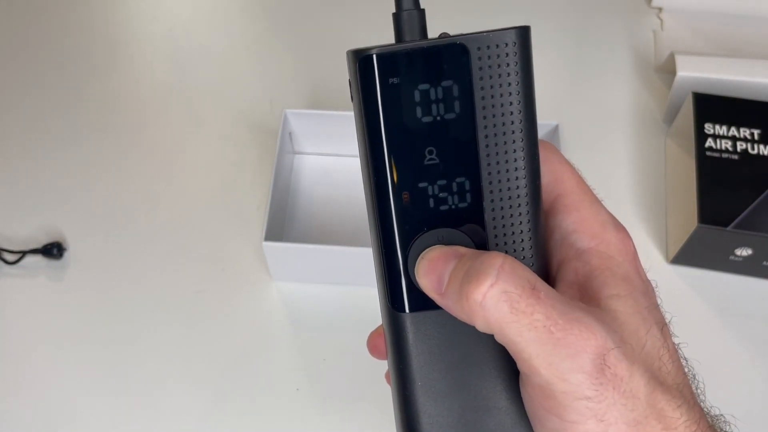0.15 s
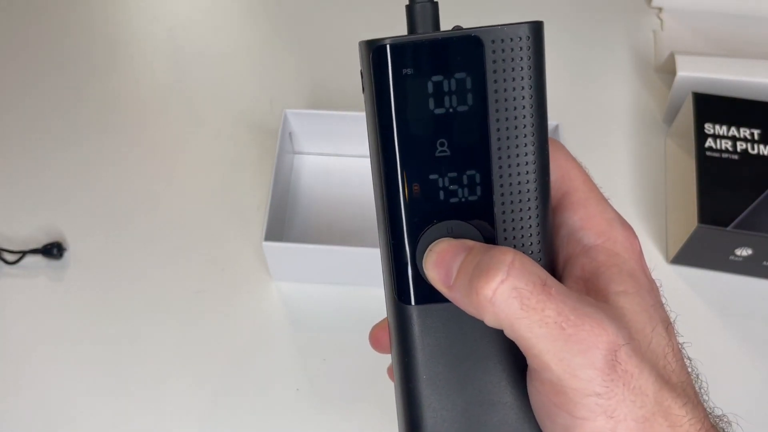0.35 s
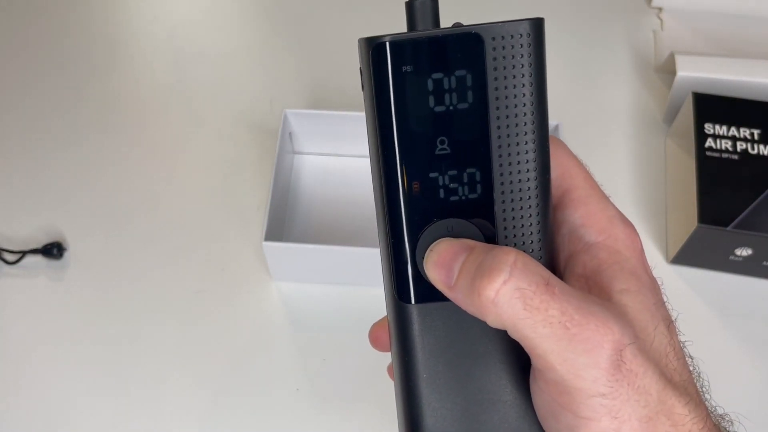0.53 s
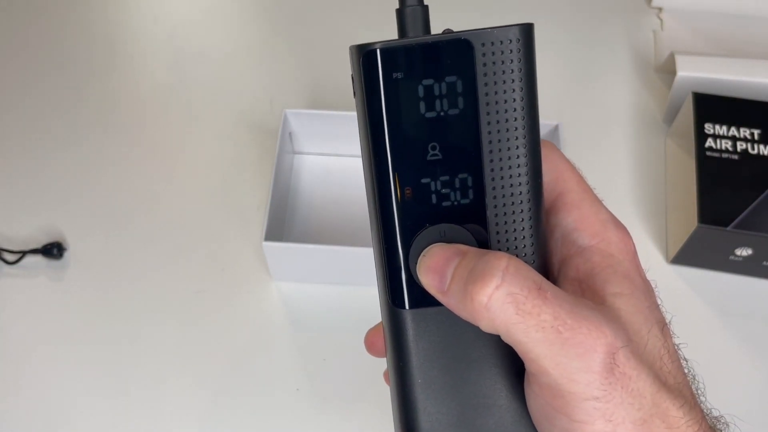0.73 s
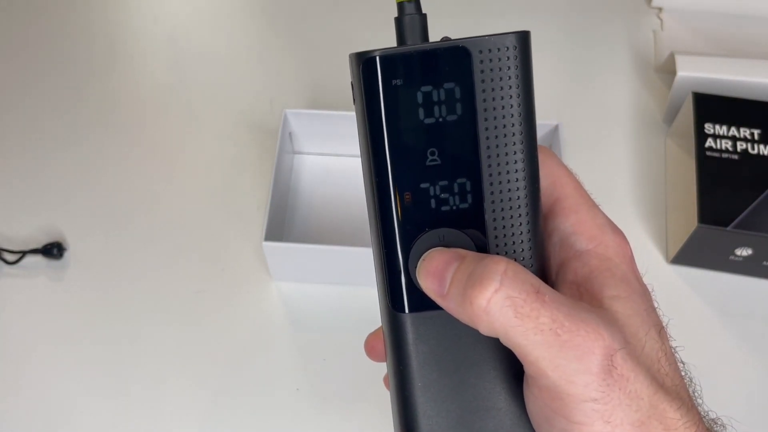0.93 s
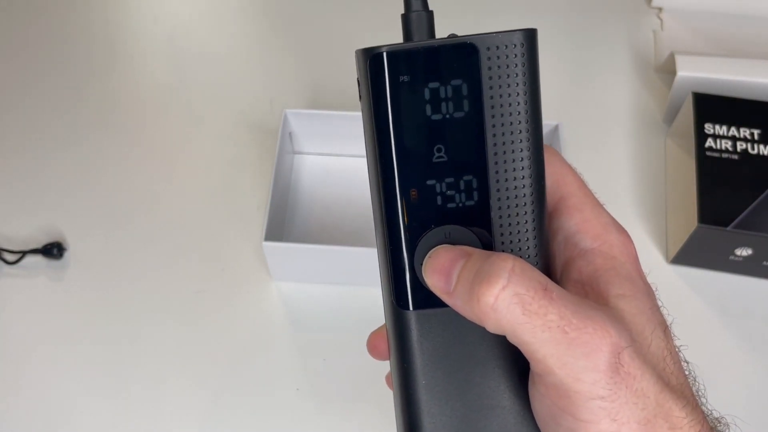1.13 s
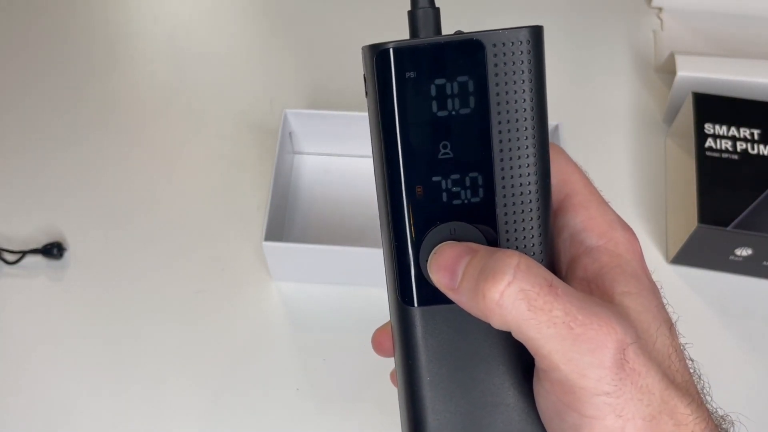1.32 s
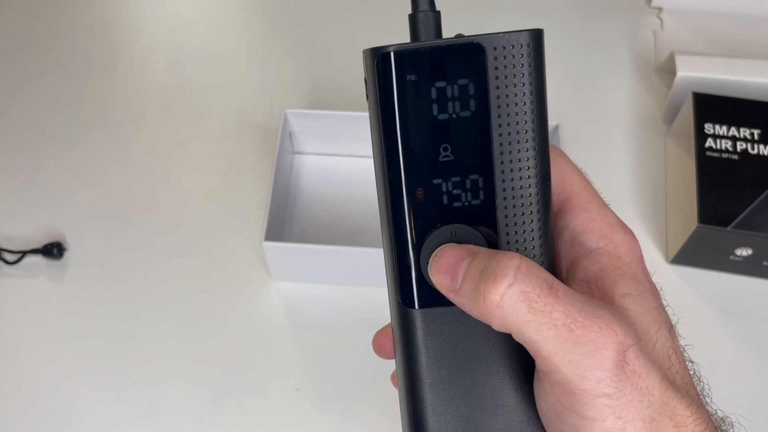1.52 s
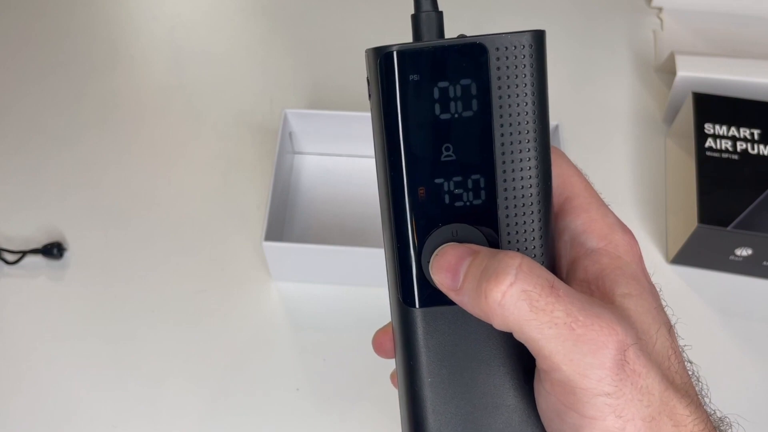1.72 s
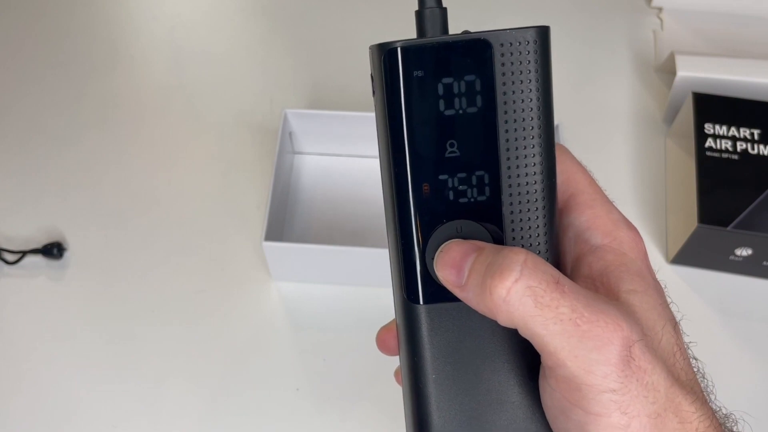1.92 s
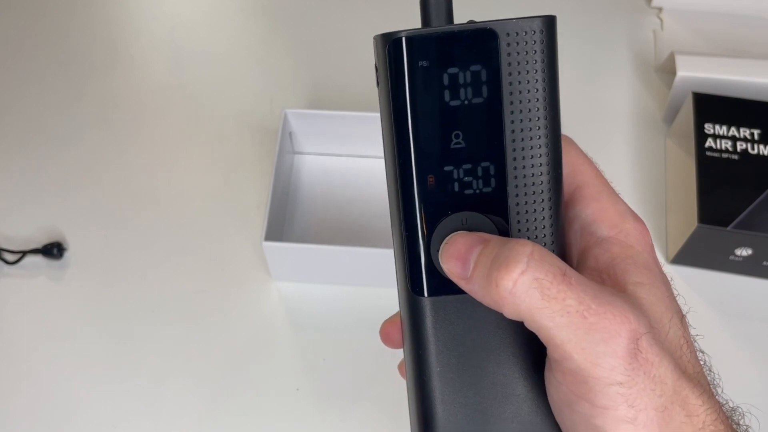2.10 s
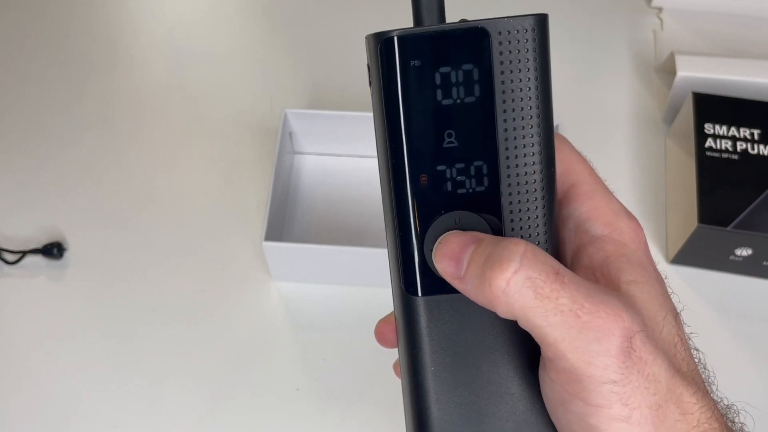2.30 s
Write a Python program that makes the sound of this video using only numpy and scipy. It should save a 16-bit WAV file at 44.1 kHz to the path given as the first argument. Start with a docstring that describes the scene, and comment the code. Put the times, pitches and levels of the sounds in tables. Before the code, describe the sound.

A small electric air pump is switched on close by in a quiet room. Soft room air and low hum until 0.32 s, then a faint button click and a hard jolt around 0.35 s. The motor climbs in pitch until about 0.5 s, then holds a dense, bright buzz of about fifty knocks per second, with plastic rattle, gear whine and airy spits, slightly softer after 1 s, still running at 2.3 s.

```python
"""A hand-held electric tire pump, switched on close by in a quiet room with a low hum, heard in stereo. A small
motor drives a one-cylinder piston pump through an 11 : 50 gear. Valve knocks are ringing contacts, outlet puffs
are sums of crank orders, valve spits are treble noise: all repeat once per crank turn. Tooth contacts and loose
rattle are coloured by the plastic shell; sines make the motor and gear whine. Before the pump starts only room
air, hum and the button clicks are heard; the room sinks as the pump comes in."""
import sys
import numpy as np
from scipy import signal
from scipy.fft import rfft, irfft, next_fast_len
from scipy.io import wavfile
from scipy.ndimage import uniform_filter1d

SR = 44100
rng = np.random.default_rng(int(sys.argv[2]) if len(sys.argv) > 2 else 0)


def inscribe(sig):
    """Save sig as 16-bit PCM at rate SR to the path in sys.argv[1].

    A 1-D sig is mono; a 2-D sig holds one channel per row.
    Samples are clipped to [-1, 1] before scaling.
    """
    pcm = np.round(np.clip(np.atleast_2d(sig).T, -1, 1) * 32767)
    wavfile.write(sys.argv[1], SR, pcm.astype(np.int16))


N = 103635

# room air before the start: f/Hz, relative density level/dB per Hz
ROOM_AIR = [(15, -33), (25, -10), (59, -5), (125, -2.5), (167, -13.5), (224, -11), (515, -20.5),
            (6370, -58.5), (9020, -67.5), (15000, -63)]
# low hum lines before the start: f/Hz, level/dB
ROOM_HUM = [(59.2, -55), (118.4, -56), (177.6, -70), (215.3, -61), (269.2, -65), (349.9, -68)]
# thumb on the button, first jolt of the drive: t/s, peak level/dB, f/Hz, t60/s of each of two rings
BUTTON_CLICKS = [(.321, -37.5, 890, 0.0051), (0.321, -45, 1900, 0.0038), (.3215, -56, 2900, .003),
                 (0.341, -34, 2970, 0.0045), (0.347, -16, 2880, 0.0062), (0.3653, -7.5, 1500, 0.013)]
# crank speed: t/s, speed/turns per s
CRANK_SPEED = [(0.345, 36.0), (0.37, 38.7), (0.4, 41.86), (0.44, 47.05), (0.48, 48.68), (0.53, 50.03),
               (0.65, 50.06), (0.9, 50.28), (1.2, 50.45), (1.6, 50.59), (2.0, 50.74), (2.35, 50.79)]
# gain of the running pump: t/s, level/dB
PUMP_LEVEL = [(.35, -21), (.37, -16.5), (.43, -17.5), (.5, -20), (.75, -19), (.84, -20), (.91, -19),
              (.96, -22), (1.2, -22.5), (1.6, -22.5), (2.0, -23), (2.35, -23)]
# load on the gear around a crank turn: position/share of turn, level/dB
GEAR_LOAD = [(0, 1), (.14, -4.5), (.38, 0), (.56, -1), (.66, -1), (.8, 3), (.92, -2)]
# what the plastic shell radiates: f/Hz, relative density level/dB per Hz
SHELL_BODY = [(400, -28), (550, -24), (800, -14), (1100, -16.5), (1500, -14.5), (2000, -8), (2300, -9),
              (2750, -3), (3100, -5.5), (3500, -17), (4000, -10.5), (4500, -18), (4900, -22), (5300, -14),
              (5700, -11.5), (6100, -26), (6350, -9.5), (6600, -29.5), (7000, -19)]
# treble end of the same shell curve: f/Hz, relative density level/dB per Hz
SHELL_TREBLE = [(7600, -24), (8500, -24), (9500, -23), (11000, -25), (13000, -26), (14500, -25),
                (15000, -29), (15700, -30)]
# knocks in each turn: position/share of turn, relative level/dB, f/Hz, t60/s of each of two rings, spread/dB
VALVE_KNOCKS = [(0.92, -14, 1095, 0.0085, 5.5), (.78, -4, 2200, 0.019, 1), (0.1059, -7, 2600, 0.031, 3),
                (.76, -9.5, 1310, 0.0071, 0), (0.61, -12.5, 6000, 0.0074, 1.5)]
# motor and gear tones: multiple of motor speed, relative level/dB, depth of swing with the crank/0-1
WHINE_TONES = [(3, -27.5, 0), (11, -14.5, 0.1), (12, -5.5, 0.28), (13, -32.5, .4), (20, -23.5, 0.2)]
# air pulse at the open outlet: crank order, relative level/dB at 1.3 s, change/dB per s
PUFF_ORDERS = [(2, -8, 0), (3, 0, 0), (4, 0, -1), (5, -4, 0), (6, -1, 0), (7, -3, -7), (8, -9, -3),
               (9, -7, 0), (10, -13, -6), (11, -9, -2), (12, -3, -1), (13, -5, -1), (14, -5, 0),
               (15, -5, 0), (16, -1, -6), (17, -1, -6), (18, -5, -4), (19, -2, -4)]
# stereo width: f/Hz, side minus mid level/dB
STEREO_WIDTH = [(60, -26.5), (200, -31.5), (350, -13.5), (600, -13), (1100, -11.5), (1500, -32),
                (1950, -69), (2200, -12.5), (2750, -8), (3500, -13.5), (4300, -1.5), (4900, -6),
                (5400, -0.5), (6100, -18.5), (7000, -2), (7800, 1), (8500, 8), (9000, 35.5), (10800, 48.5),
                (11400, 8), (12000, 7), (13000, -6.5), (14300, -1), (14700, -23.5)]

WHEEL_TEETH, PINION_TEETH = 50, 11
MOTOR_RATIO = WHEEL_TEETH / PINION_TEETH   # motor turns per crank turn
MAX_TURNS, MAX_TEETH = 120, 6000   # more than the scene needs
START_S, RISE_S = 0.345, 0.011
ROOM_DB, ROOM_SINKS = -54.5, 0.32   # the room sinks by this share of the pump's rise in dB
PUMP_RISE_DB = 30   # rise assumed for that sinking
RATTLE_DB, TEETH_DB = 0, -11.5   # relative levels
GRAINS_PER_S, GRAIN_SPREAD_DB = 20000, 2
TOOTH_WEAR_DB, TOOTH_SPREAD_DB, TOOTH_CUT_HZ = 4, 2, 7000
RUNOUT = 0.15   # depth of the swing with each pinion turn
RATTLE_APART = 0.65   # share of the side rattle drawn independently of the middle
KNOCK_JITTER_S = 0.00008
COLD_DB, COLD_S = 8.5, 0.066   # knocks are harder while the pump gets up to speed
VALVE_AT, VALVE_S = 0.76, 0.0008   # share of turn, decay time constant
VALVE_DB, VALVE_SPREAD_DB, VALVE_HZ = 2, 3.5, 7740
WAVER_DB = 2
WHINE_GROWS = 6   # power of speed by which the whine grows
PUFF_DB, FIRST_PUFF_S, PUFF_RISE_S = -24, 0.356, 0.008
PUFF_AT, PUFF_LAG = 0.62, 1.3   # order k arrives at PUFF_AT + PUFF_LAG / k of the turn, less constants
SIDE_TURN = 0.28   # the side leads the mid by this share of a cycle
CUTOFF_HZ = 15780


def amp(db):
    """Decibels to amplitude."""
    return 10 ** (np.asarray(db) / 20)


def rms_one(x):
    """Scale to an RMS of 1."""
    return x / np.sqrt(np.mean(x ** 2) + 1e-20)


def in_time(rows):
    """Straight lines between the points of a time table."""
    return np.interp(np.arange(N) / SR, *np.transpose(rows))


def at_hz(points, hz):
    """A dB curve read on a logarithmic frequency scale."""
    table = np.array(points)
    return np.interp(np.log(np.maximum(hz, 1)), np.log(table[:, 0]), table[:, 1])


def colour(x, points):
    """Causal (minimum-phase) filter with the given dB curve, by folding its cepstrum."""
    size = next_fast_len(N + 4096)
    cepstrum = irfft(np.log(amp(at_hz(points, np.fft.rfftfreq(4096, 1 / SR)))))
    cepstrum[1:2048] *= 2
    cepstrum[2049:] = 0
    response = irfft(np.exp(rfft(cepstrum)))
    return irfft(rfft(x, size) * rfft(response, size), size)[..., :N]


def drift(rate):
    """Slow chance of spread 1: noise through two equal low-pass poles at rate Hz."""
    r = np.exp(-2 * np.pi * rate / SR)
    noise = rng.standard_normal(N + 9000)
    return rms_one(signal.lfilter([1], [1, -2 * r, r * r], noise)[9000:])


def place(at, sizes):
    """Clicks at fractional sample positions, each shared between two samples."""
    out, keep = np.zeros(N + 2), at < N
    i = at[keep].astype(int)
    fraction = at[keep] - i
    np.add.at(out, i, sizes[keep] * (1 - fraction))
    np.add.at(out, i + 1, sizes[keep] * fraction)
    return out[:N]


def turn_times(turn, counts):
    """Sample positions where the crank reaches the given turn counts."""
    return np.interp(counts, turn, np.arange(N), right=N)


def ring(clicks, hz, t60):
    """A unit click sets a decaying sine of starting height 1 ringing."""
    r, w = amp(-60 / (t60 * SR)), 2 * np.pi * hz / SR
    return signal.lfilter([0, np.sin(w)], [1, -2 * r * np.cos(w), r * r], clicks + 1e-18)


def knock(clicks, hz, t60):
    """A soft contact: two rings in a row build over a few cycles, then die; peak near 1."""
    twice = ring(ring(clicks, hz, t60), hz, t60)
    return twice * 2 * np.e * np.log(1000) / (t60 * SR)


def room(rise_db):
    """Soft air noise and gently wavering hum, sinking as the pump rises."""
    t = np.arange(N) / SR
    air = amp(ROOM_DB) * rms_one(colour(rng.standard_normal(N), ROOM_AIR))
    hum = 0
    for hz, db in ROOM_HUM:
        hum = hum + amp(db + 1.4 * drift(11)) * np.sqrt(2) * np.sin(2 * np.pi * hz * t)
    return (air + hum) * amp(-ROOM_SINKS * rise_db)


def clicks():
    """Button and first jolt of the drive: single dry ringing contacts."""
    out = 0
    for s, db, hz, t60 in BUTTON_CLICKS:
        out = out + knock(place(np.array([s * SR]), amp([db])), hz, t60)
    return out


def gear(turn):
    """Worn tooth contacts and loose rattle through the shell, swung by crank load and pinion runout."""
    count = np.arange(MAX_TEETH)
    wheel_wear = rng.standard_normal(WHEEL_TEETH)[count % WHEEL_TEETH]
    pinion_wear = rng.standard_normal(PINION_TEETH)[count % PINION_TEETH]
    tooth_db = TOOTH_WEAR_DB * (wheel_wear + pinion_wear)
    tooth_db = tooth_db + TOOTH_SPREAD_DB * rng.standard_normal(MAX_TEETH)
    teeth = place(turn_times(turn, count / WHEEL_TEETH), amp(tooth_db))
    teeth = signal.sosfilt(signal.butter(2, TOOTH_CUT_HZ, fs=SR, output="sos"), teeth)

    sizes = amp(GRAIN_SPREAD_DB * np.minimum(rng.exponential(1, N), 5)) * rng.choice([-1, 1], N)
    grains = sizes * (rng.random(N) < GRAINS_PER_S / SR)

    shell = [(60, -77), (130, -38.5), (250, -28.5)] + SHELL_BODY + SHELL_TREBLE
    rattle = amp(RATTLE_DB) * rms_one(colour(grains, shell))
    mesh = amp(TEETH_DB) * rms_one(colour(teeth, shell))
    load = amp(np.interp(turn, *np.transpose(GEAR_LOAD), period=1))
    runout = 1 + RUNOUT * np.cos(2 * np.pi * turn * MOTOR_RATIO)
    return load * runout * (rattle + mesh)


def knocks(turn):
    """Valve and piston contacts, each once a turn with a little scatter."""
    out = 0
    for share, db, hz, t60, spread_db in VALVE_KNOCKS:
        jitter, spread = rng.standard_normal((2, MAX_TURNS))
        at = turn_times(turn, np.arange(MAX_TURNS) + share) + jitter * KNOCK_JITTER_S * SR
        cold_db = COLD_DB * np.exp(-(at / SR - START_S) / COLD_S)
        out = out + knock(place(at, amp(db + cold_db + spread_db * spread)), hz, t60)
    return out


def valve(turn):
    """Reed valve: each turn a bright spit of air, treble noise that dies within a few milliseconds."""
    at = turn_times(turn, np.arange(MAX_TURNS) + VALVE_AT)
    sizes = amp(VALVE_DB + VALVE_SPREAD_DB * rng.standard_normal(MAX_TURNS))
    envelope = signal.lfilter([1], [1, -np.exp(-1 / (VALVE_S * SR))], place(at, sizes))
    highpass = signal.butter(2, VALVE_HZ, "high", fs=SR, output="sos")
    return signal.sosfilt(highpass, envelope * rng.standard_normal(N))


def whine(turn, speed):
    """Motor and mesh tones, swinging with the crank, wavering, and growing with speed."""
    motor = turn * MOTOR_RATIO
    out = 0
    for k, db, depth in WHINE_TONES:
        swing = 1 + depth * np.cos(2 * np.pi * (turn - 0.15))
        level = amp(db + WAVER_DB * drift(23)) * swing
        out = out + level * np.sqrt(2) * np.sin(2 * np.pi * k * motor)
    return out * (speed / speed.max()) ** WHINE_GROWS


def puffs(turn):
    """The outlet pulse as wavering crank orders; the lows trail behind the highs."""
    t = np.arange(N) / SR
    out = 0
    for k, db, slope in PUFF_ORDERS:
        phase = 2 * np.pi * (k * (turn - PUFF_AT) - PUFF_LAG * np.log(k))
        out = out + amp(db + slope * (t - 1.3) + drift(17)) * np.cos(phase)
    fade_in = np.clip((t - FIRST_PUFF_S) / PUFF_RISE_S, 0, 1)
    return amp(PUFF_DB) * np.sqrt(2) * out * fade_in


def stereo(middle, other):
    """Mid and side, shared by pitch, then added and subtracted for left and right."""
    size = next_fast_len(N + 4096)
    share = 1 / (1 + amp(-2 * at_hz(STEREO_WIDTH, np.fft.rfftfreq(size, 1 / SR))))
    mid = irfft(rfft(middle, size) * np.sqrt(1 - share), size)[:N]
    side = irfft(rfft(other, size) * np.sqrt(share) * np.exp(2j * np.pi * SIDE_TURN), size)[:N]
    return np.array([mid + side, mid - side])


def scene():
    """Pump close by, clicks and room in stereo."""
    t = np.arange(N) / SR
    speed = in_time(CRANK_SPEED)
    turn = np.cumsum(speed * (t > START_S) + 1e-6) / SR   # tiny creep keeps it increasing
    on = np.clip((t - START_S) / RISE_S, 0, 1)
    gain = on * amp(in_time(PUMP_LEVEL))
    rise_db = PUMP_RISE_DB * uniform_filter1d(on, 900)

    steady = gain * (knocks(turn) + valve(turn) + whine(turn, speed) + puffs(turn)) + clicks()
    middle_gear, other_gear = gain * gear(turn), gain * gear(turn)
    side_gear = np.sqrt(1 - RATTLE_APART) * middle_gear + np.sqrt(RATTLE_APART) * other_gear
    return stereo(steady + middle_gear + room(rise_db), steady + side_gear + room(rise_db))


def record(dry):
    """The top is cut by a steep elliptic low-pass."""
    return signal.sosfilt(signal.ellip(12, 0.3, 75, CUTOFF_HZ, fs=SR, output="sos"), dry)


dry = scene()
out = record(dry)
inscribe(out)
```